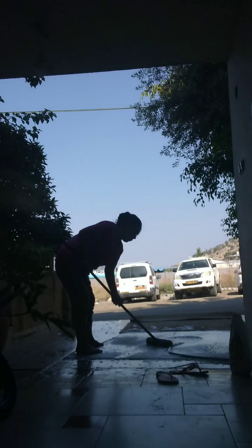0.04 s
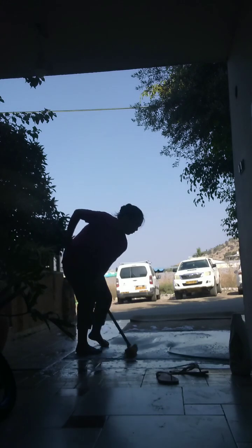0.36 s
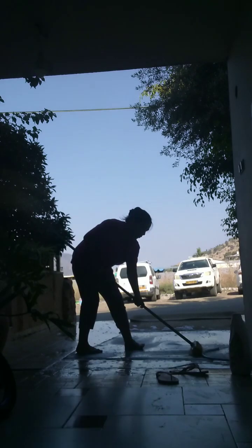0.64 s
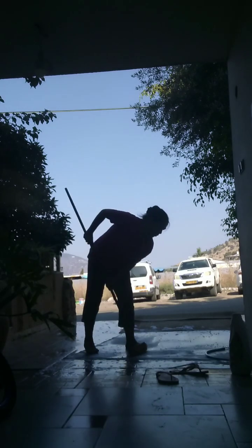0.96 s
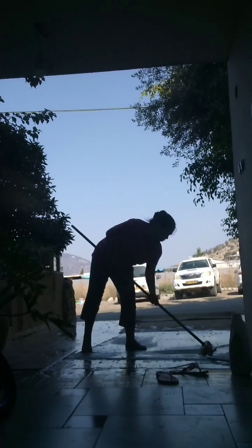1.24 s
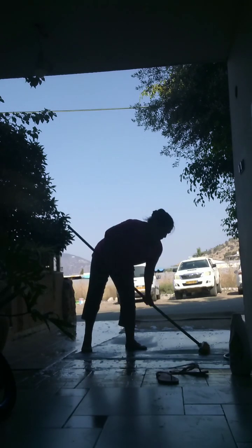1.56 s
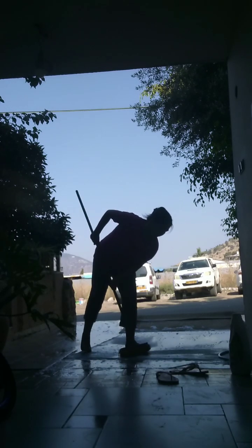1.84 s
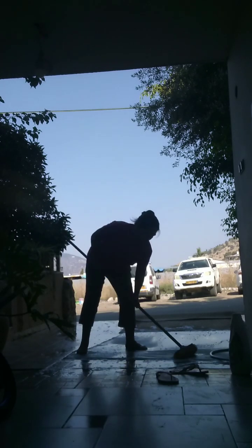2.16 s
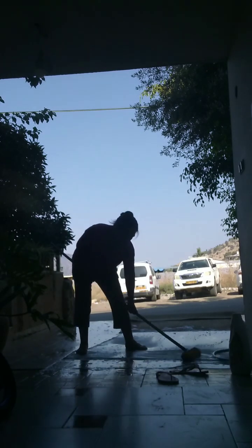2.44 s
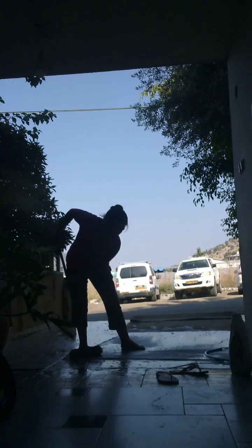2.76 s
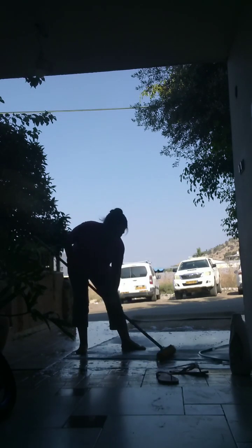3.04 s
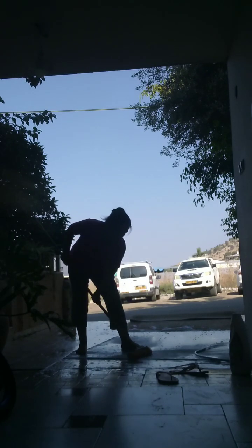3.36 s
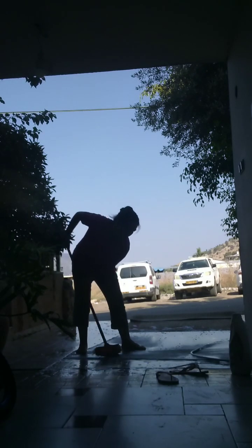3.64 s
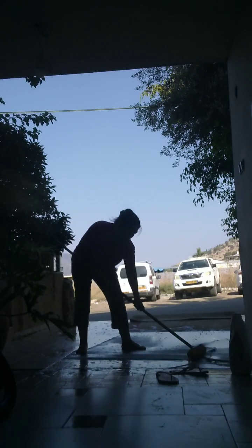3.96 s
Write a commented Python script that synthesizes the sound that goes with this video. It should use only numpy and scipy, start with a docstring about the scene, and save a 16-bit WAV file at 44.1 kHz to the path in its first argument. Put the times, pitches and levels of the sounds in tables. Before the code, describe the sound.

A stiff brush scrubs soaked carpet from the start, making about ten push-and-pull strokes in four seconds. Each is a scratchy swish with churning water and fizzing, popping froth, strongest around 2, 2.9 and 3.7 seconds. Small squirts of water come near 0.7, 1.4, 2.2 and 3.4 seconds. The tiled porch adds a short echo, and a low outdoor rumble runs underneath.

```python
"""Scrubbing a soaked carpet

A stiff long-handled brush is pushed and pulled over wet carpet in a tiled, open-fronted porch.
Bristle tips flick through the pile, water churns and squirts, and froth fizzes and pops.
Reflections from the hard walls blur every stroke; a low outdoor rumble excites the porch's air modes."""
import sys
import numpy as np
from scipy import signal
from scipy.fft import rfft, irfft
from scipy.io import wavfile
from scipy.ndimage import uniform_filter1d

SR = 44100
rng = np.random.default_rng(int(sys.argv[2]) if len(sys.argv) > 2 else 0)


def dump_mix(stems):
    """Bounce the given channels to the path in sys.argv[1] as a 16-bit WAV at rate SR."""
    frames = np.atleast_2d(stems).T  # one column per channel
    limited = np.clip(frames, -1, 1)  # hard clip at full scale
    pcm = np.round(limited * 32767).astype(np.int16)
    wavfile.write(sys.argv[1], SR, pcm)


N = 176400

# Pull and push in turn: start_s, length_s, attack_s, release_s, level_db, sag_db, water_db, froth_db
BRUSH_STROKES = [(-.06, 0.51, 0.13, 0.048, -8, 10.5, -2.5, -9.5), (0.351, 0.43, 0.12, 0.16, -2, 7, 2, -4),
                 (0.756, 0.27, .08, 0.11, -3, -3.5, -6, -6.5),
                 (1.027, 0.54, 0.12, 0.067, -4, 14, 0.5, -5.5),
                 (1.453, 0.41, 0.2, 0.14, -2.5, -9.5, -9, -3),
                 (1.925, 0.49, 0.099, 0.25, -0.3, -3, -1, -0.5), (2.346, 0.48, .19, 0.15, -3, -3, -3, -4.5),
                 (2.807, 0.44, 0.12, .16, 0.05, -1.5, -0.7, -0.5),
                 (3.232, 0.35, 0.09, 0.066, -6.5, -1.5, -5.5, -5),
                 (3.621, 0.43, 0.11, 0.17, -0.6, 0.5, 0.4, -1.5)]
# Water squirting as the head tips over: start_s, length_s, centre_hz, level_db
WATER_SQUIRTS = [(0.739, 0.038, 4560, -47.5), (1.384, 0.038, 4500, -44.5), (1.447, 0.038, 2640, -46),
                 (1.45, .08, 4700, -58), (1.952, 0.058, 5700, -50), (2.211, 0.087, 4540, -47),
                 (3.373, 0.089, 4650, -50.5)]
# Soaked pile ringing under the head: start_s, length_s, centre_hz, width_hz, level_db
PILE_RASPS = [(0.44, 0.046, 1750, 220, -49.5), (0.515, .12, 3130, 506, -48.5),
              (1.123, 0.044, 3020, 420, -43), (1.202, 0.089, 675, 130, -52.5),
              (1.235, 0.12, 1600, 700, -48), (2.09, .14, 750, 149, -52), (2.9, 0.11, 1750, 450, -49.5)]
# Spectra of bristles, churned water, froth and outdoor noise: frequency_hz, relative_db
BRISTLE_SPECTRUM = [(300, -25), (700, -16), (1000, -14), (1250, -13), (1650, -5.5), (1950, -8.5),
                    (2200, -1.1), (2500, -3.5), (2900, 0), (3700, 0), (4900, -2), (6500, -4.5), (8500, -4),
                    (10500, -32), (12500, -35), (15500, -32)]
WATER_SPECTRUM = [(200, -3), (430, -6), (560, -3.5), (720, 0), (1000, -0.5), (1200, -5.5), (1700, 0),
                  (2800, -1), (4500, -12.5), (9000, -30)]
FROTH_SPECTRUM = [(2000, -16.5), (5000, -6), (7200, -13.5), (8500, -0.5), (9300, -2), (10300, -11.5),
                  (12000, -22), (15500, -25.5)]
OUTDOOR_SPECTRUM = [(15, 1.5), (60, -6.5), (110, -5.5), (180, -9.5), (310, -12), (430, -8.5), (600, -19),
                    (1100, -35.5), (3000, -31), (8000, -31), (15000, -58)]
# Stereo balance of the outdoor noise: frequency_hz, left_minus_right_db
OUTDOOR_BALANCE = [(120, .6), (220, 1), (400, 5.5), (1500, 3.5)]
# Air resonances of the porch: centre_hz, width_hz, level_db
AIR_MODES = [(25.42, 7.3, -34), (48, 12, -49.5), (75.4, 6.4, -54), (97, 15.2, -52.5), (143, 11.5, -65),
             (161.2, 12.5, -62), (197.3, 9.2, -64), (237.9, 9, -63)]
# Slow swell of those resonances: time_s, gain_db
MODE_SWELL = [(0, 0.5), (.85, 2), (1.3, -2.2), (2.6, -0.8), (3.3, -2), (3.7, 1.5), (4, -1.5)]

FLICKS_PER_S, SPLATS_PER_S, BUBBLES_PER_S, POPS_PER_S = 6000, 1800, 8000, 330
BRISTLE_LEFT_DB = 2.5


def brush(t):
    """Superposition: countless small impacts of bristles, water and froth merge into coloured noise."""
    rub, scratch, churn, fizz = stroke_envelopes(t)
    bristles = colour(patchy(ticks(FLICKS_PER_S, spread_db=3.5)), BRISTLE_SPECTRUM) * rub * undb(-43)
    bite = resonate(ticks(FLICKS_PER_S, spread_db=2), hz=4770, width_hz=3100) * scratch * undb(-47)
    bubbles = bubble_pops() * rub * undb(-50)
    water = colour(patchy(ticks(SPLATS_PER_S, spread_db=5.5)), WATER_SPECTRUM) * churn * undb(-47.5)
    froth = colour(ticks(BUBBLES_PER_S, spread_db=5), FROTH_SPECTRUM) * fizz * undb(-45.5)
    head = (bristles + bite + bubbles) * pan(BRISTLE_LEFT_DB)
    judder = undb(0.5 * wander(rate_hz=69.9))
    return (head + water * pan(3) + froth * pan(-1.9)) * judder


def stroke_envelopes(t, rest_db=-17.5, bite_delay_s=0.14, bite_s=0.027, drain_db=-15.5, drain_s=0.088):
    """Amplitude modulation: rubbing and fizz follow brush speed, and churning peaks at mid-stroke."""
    rub = fizz = undb(rest_db)  # the bristles keep stirring between strokes
    scratch = churn = 0
    for start, length, attack, release, level_db, sag_db, water_db, froth_db in BRUSH_STROKES:
        age = t - start
        progress = np.clip(age / length, 0, 1)
        speed = ramp(age / attack) * ramp((length - age) / release) * undb(sag_db * (.5 - progress))
        rub = np.hypot(rub, speed * undb(level_db))  # incoherent sounds add in power
        fizz = np.hypot(fizz, speed * undb(froth_db))
        upright = np.exp(-((age - bite_delay_s) / bite_s) ** 2)  # tips scratch before they bend over
        scratch = scratch + speed * upright * undb(level_db) ** 2
        squeeze = abs(np.sin(np.pi * progress)) ** 1.5
        drain = undb(drain_db + water_db) * np.exp(-((age - length) / drain_s) ** 2)  # water runs back
        churn = np.hypot(churn, np.hypot(squeeze, drain) * undb(water_db))
    return rub, scratch, churn, fizz


def patchy(x, bands=9, depth_db=1.33, rate_hz=24.22):
    """Band-wise modulation: over wetter and drier patches each half octave swells on its own."""
    spectrum = rfft(x)
    place = np.clip(2 * np.log2(freqs() / 600), 0, bands - 1)
    parts = (irfft(spectrum * np.maximum(1 - abs(place - k), 0), N) for k in range(bands))
    return unit(sum(part * undb(depth_db * wander(rate_hz)) for part in parts))


def bubble_pops(low_hz=1601, high_hz=5210, decay_cycles=16.3):
    """Damped oscillation: each larger bubble bursts and rings briefly at a pitch set by its size."""
    out, age = np.zeros((2, N)), np.arange(SR // 32) / SR
    for when, smallness, strength, left_share, lag in rng.random((int(POPS_PER_S * N / SR), 5)):
        hz = low_hz * (high_hz / low_hz) ** smallness
        phase = 2 * np.pi * (hz * age + np.array([[0], [lag]]))
        envelope = strength * ramp(age * hz / 2) * np.exp(-age * hz / decay_cycles)
        ring = np.sin(phase) * envelope * np.sqrt([[left_share], [1 - left_share]])
        first = int(when * N)
        out[:, first:first + len(age)] += ring[:, :N - first]
    return unit(out)


def squirts_and_rasps(t, spray_width_hz=1600):
    """Impact-driven resonance: droplets sound broad bands as spray and narrower ones in the wet pile."""
    drops = ticks(FLICKS_PER_S, spread_db=2)
    spray = sum(burst(t, drops, start, length, hz, spray_width_hz, db)
                for start, length, hz, db in WATER_SQUIRTS)
    rasps = sum(burst(t, drops, *row) for row in PILE_RASPS)
    return (spray + rasps) * pan(BRISTLE_LEFT_DB)


def porch(x, t, patterns=4, change_s=.15, t60_s=0.34, first_echo_s=.004, wet_db=-4.5):
    """Reverberation: hard walls add a bright tail whose reflection pattern shifts as the brush moves."""
    age, wet = t[:SR // 2], 0
    for k in range(patterns):
        tail = rng.standard_normal((2, len(age))) * undb(-60 * age / t60_s) * (age > first_echo_s)
        crossfade = np.sqrt(ramp(1 - abs((t / change_s + k) % patterns - patterns / 2)))
        wet = wet + signal.fftconvolve(x * crossfade, unit(tail) / np.sqrt(len(age)), axes=1)[:, :N]
    return (x + undb(wet_db) * wet) / np.hypot(1, undb(wet_db))


def outdoors(t, wide_hz=890):
    """Cavity resonance: distant rumble booms in the porch's air modes; a short drone sounds outside."""
    boom = sum(resonate(rng.standard_normal(N), hz, width) * undb(db) for hz, width, db in AIR_MODES)
    swell = undb(np.interp(t, *np.array(MODE_SWELL).T))
    mid, side = rfft(rng.standard_normal((2, N)))
    apart = np.minimum(freqs() / wide_hz, 1) ** 2  # the bass is alike on both sides
    air = irfft((mid + np.array([[1], [-1]]) * apart * side) * pan(curve(OUTDOOR_BALANCE)), N)
    drone = burst(t, rng.standard_normal(N), start_s=0.0088, length_s=0.3, hz=109.8, width_hz=8.4, db=-46)
    return (boom * swell + drone) * pan(1.84) + colour(air, OUTDOOR_SPECTRUM) * undb(-50)


def ticks(per_s, spread_db):
    """Shot noise: random impulses of uneven size, independent in each channel, at rms 1."""
    hit = rng.random((2, N)) < per_s / SR
    size = undb(spread_db * np.clip(rng.standard_normal((2, N)), -2, 2))
    return unit(hit * size * np.sign(rng.standard_normal((2, N))))


def burst(t, drive, start_s, length_s, hz, width_hz, db):
    """Forced resonance under a half-sine envelope."""
    envelope = np.sin(np.pi * np.clip((t - start_s) / length_s, 0, 1))
    return resonate(drive, hz, width_hz) * envelope * undb(db)


def resonate(x, hz, width_hz):
    """Two second-order resonators in cascade, at rms 1."""
    f = freqs()
    detuning = (f * f - hz * hz) / (f * width_hz * np.sqrt(2))
    return unit(irfft(rfft(x) / (1 + 1j * detuning) ** 2, N))


def colour(x, spectrum):
    """Zero-phase filtering by a spectrum, at rms 1."""
    return unit(irfft(rfft(x) * undb(curve(spectrum)), N))


def curve(points):
    """Interpolation of (Hz, value) points on a log-frequency axis."""
    hz, value = np.array(points, float).T
    return np.interp(np.log(freqs()), np.log(hz), value)


def freqs():
    """Bin frequencies, at least 1 Hz."""
    return np.maximum(np.arange(N // 2 + 1) * SR / N, 1)


def wander(rate_hz):
    """Smoothed random steps, at rms 1."""
    step = max(int(SR / rate_hz), 2)
    return unit(uniform_filter1d(np.repeat(rng.standard_normal(N // step + 1), step), step)[:N])


def ramp(u):
    """Raised-cosine rise from 0 to 1."""
    return np.sin(np.pi / 2 * np.clip(u, 0, 1)) ** 2


def pan(left_db):
    """Channel gains for a left-minus-right level difference."""
    return undb(np.array([[1], [-1]]) * left_db / 2)


def undb(db):
    """Decibels to amplitude ratio."""
    return 10 ** (np.asarray(db) / 20)


def unit(x):
    """Normalisation to rms 1."""
    return x / np.sqrt(np.mean(x ** 2))


def scene():
    """Superposition of the reverberant scrubbing and the outdoor rumble."""
    t = np.arange(N) / SR
    return outdoors(t) + porch(brush(t) + squirts_and_rasps(t), t)


def record(dry):
    """Band limiting: a steep low-pass cuts the treble above 15.7 kHz."""
    return signal.sosfilt(signal.ellip(10, .2, 80, 15700, fs=SR, output="sos"), dry)


dry = scene()
out = record(dry)
dump_mix(out)
```